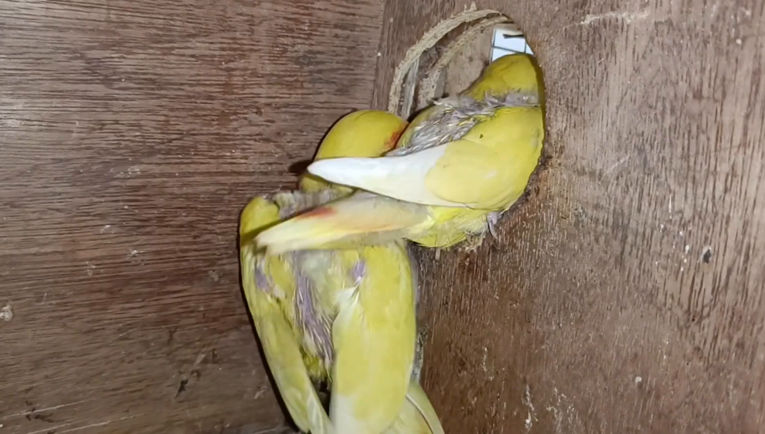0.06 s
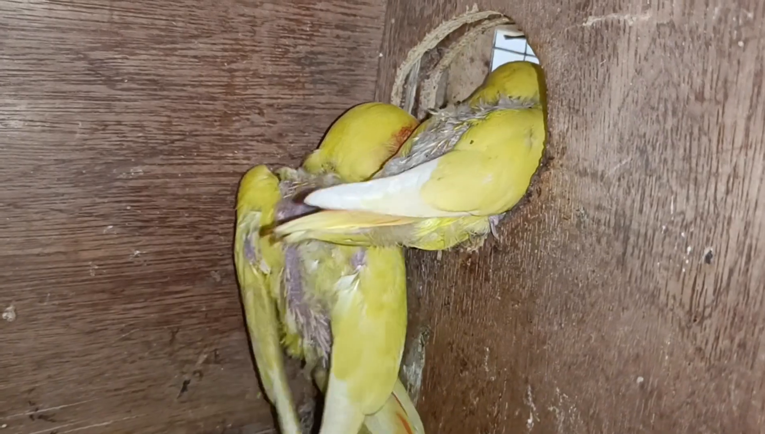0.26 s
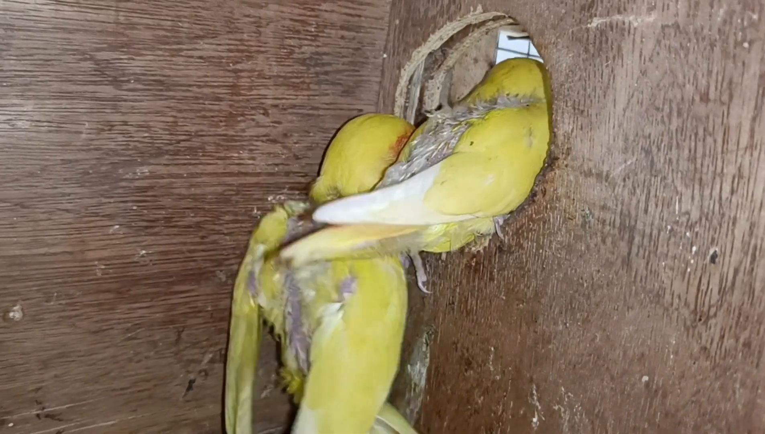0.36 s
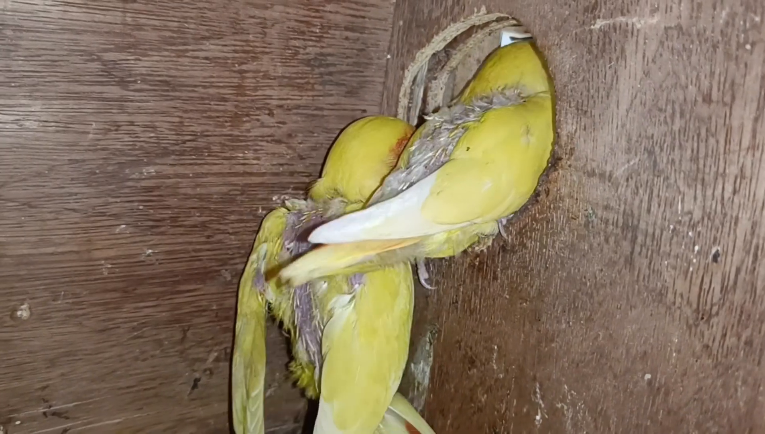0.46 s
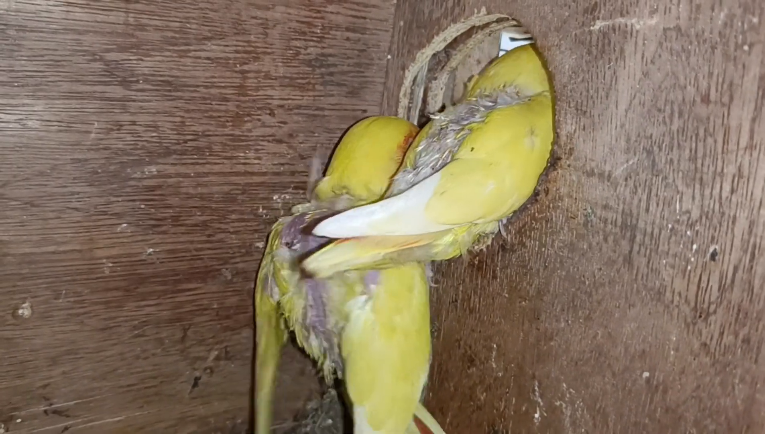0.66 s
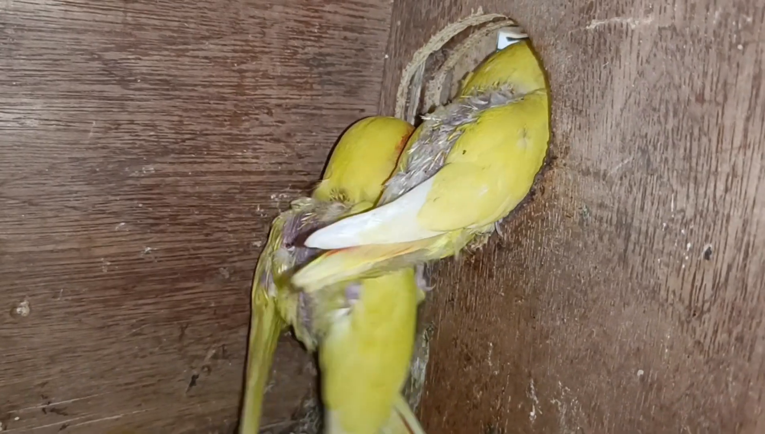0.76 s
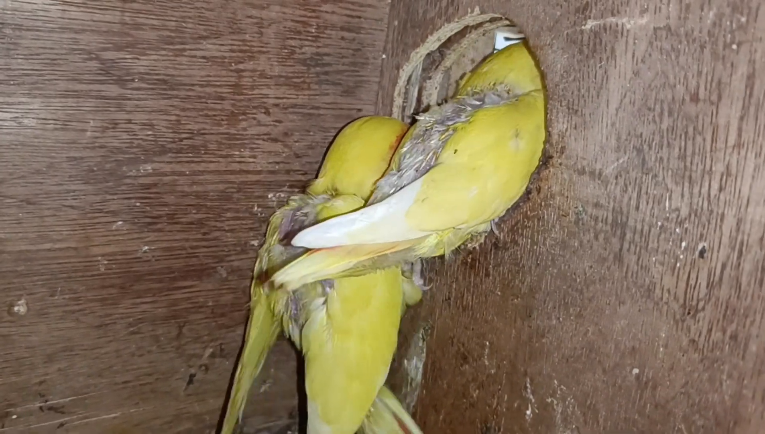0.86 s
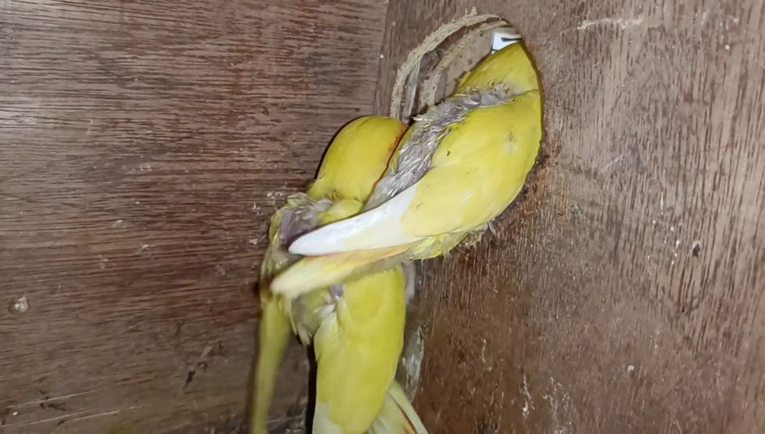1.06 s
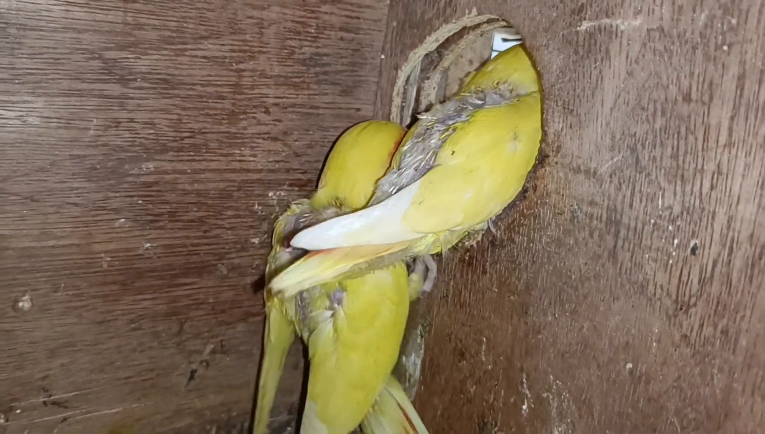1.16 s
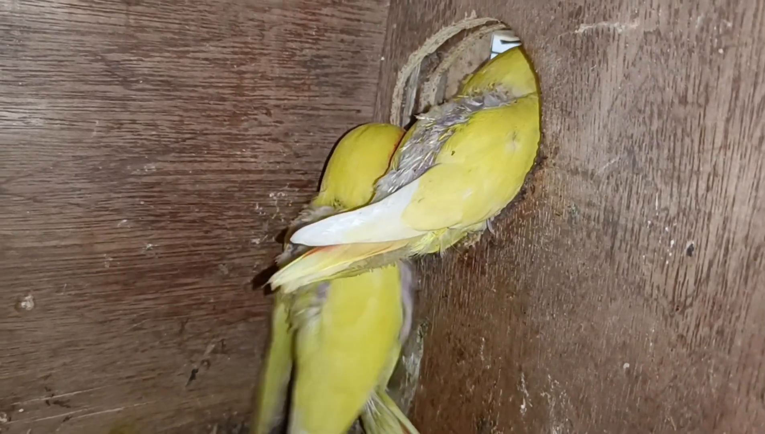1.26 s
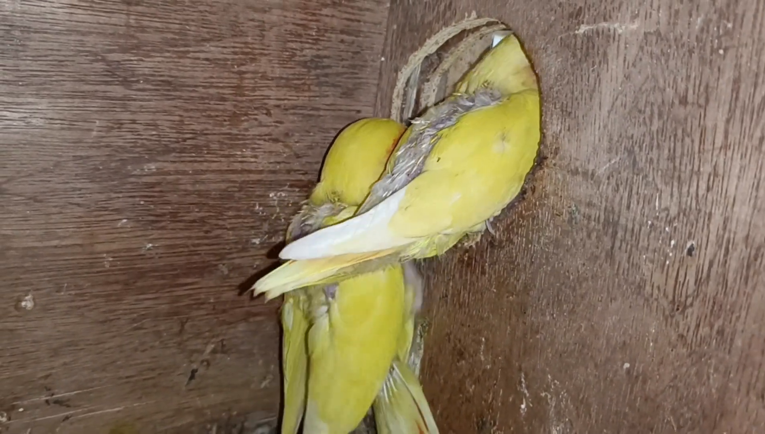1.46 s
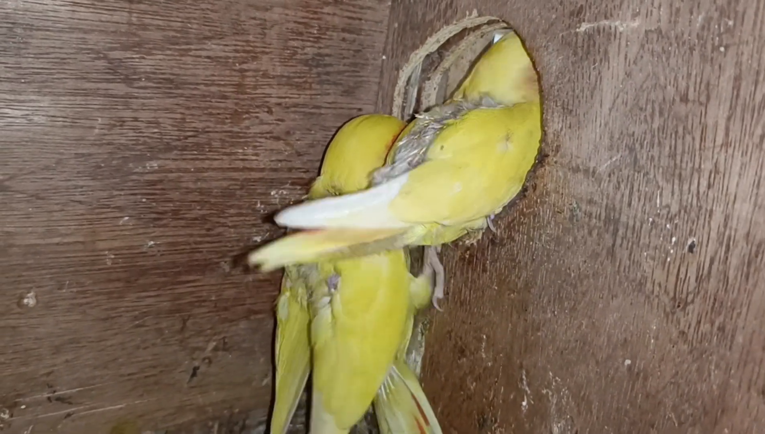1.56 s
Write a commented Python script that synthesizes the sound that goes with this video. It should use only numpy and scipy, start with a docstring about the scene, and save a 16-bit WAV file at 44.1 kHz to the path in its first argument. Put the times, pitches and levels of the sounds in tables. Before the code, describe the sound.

Small parrots call close to the microphone in a bare, ringing room: faint echo first, a short two-voiced chirp, a brief gap, then sharp flicks and a longer raspy screech with a trill, over low hum.

```python
"""Small parrots screech close by at a wooden nest box in a bare, echoing room, over a low wavering hum.
Each note is a stack of whistled overtones, roughened or trilled; noise makes a rasp of air beside them.
Smeared bands of noise make three stretches of echo: the first swells a little, the others die away.
A tick, low blips and a dull rustle lie among the calls; the room's ring is cut short once.
Box reflections and a long tail surround the birds, and the two microphone sides differ in colour and phase."""
import sys
import numpy as np
from scipy import signal
from scipy.fft import rfft, irfft
from scipy.io import wavfile

SR = 44100
rng = np.random.default_rng(int(sys.argv[2]) if len(sys.argv) > 2 else 0)


def transcribe(u):
    """Save the signal u as a 16-bit wav file named by the first command-line argument.

    u: samples, shape (n,) or (channels, n), limited to [-1, 1]; the rate is SR.
    q: integer samples, one column per channel.
    """
    v = np.clip(np.atleast_2d(u).T, -1, 1)
    q = np.round(v * 32767).astype(np.int16)
    wavfile.write(sys.argv[1], SR, q)


N = 70560    # 1.6 s

# Levels are those of the sources, ahead of the room and the microphones.
# Noise bed of the room: (frequency [Hz], relative density [dB])
HUM_SPECTRUM = [(15, -40), (30, -13.5), (85, -6.5), (118, 1.5), (160, -7), (200, -9.5), (252, -2),
                (300, -9.5), (320, -20.5), (480, -17), (800, -17.5), (1500, -28), (2500, -19), (5500, -44)]
# Wavering of the hum: (time [s], level [dB])
HUM_LEVEL = [(0, -42), (0.372, -40), (.46, -37), (0.598, -35.5), (.69, -34.5), (.84, -36.5), (1.029, -45.5),
             (1.082, -31.5), (1.131, -40), (1.382, -39), (1.6, -43)]
# How alike the hum is at the two sides: (frequency [Hz], left-right correlation [-1 to 1])
HUM_LIKENESS = [(60, .96), (160, .93), (270, .7), (600, .45), (1200, -.2), (2500, .05)]
HISS_DB = -55.5

# Echoes of earlier calls: (start [s], end [s], pitch [Hz], level [dB], fall [dB/s], overtone levels [dB],
# line width of the fundamental [Hz], rasp level [dB])
ECHOES = [(0, 0.186, 3020, -47.5, -9, [0, 0.41, -11.5], 140, -14.5),
          (0.191, 0.455, 1666, -46.5, 59.5, [1, 15, 14.5, 20, -15, -26], 74, 19),
          (0.654, 0.872, 2824, -25, 49, [0, -0.96, -10], 204, 1.5)]
ECHO_EDGE_S = 0.019

# Short dull rustle: (start [s], end [s], low edge [Hz], high edge [Hz])
RUSTLE = (.18, .238, 700, 1700)
RUSTLE_DB = -37
# The two tones of the beak tick: (frequency [Hz])
TICK_TONES = [3440, 7320]
TICK_S, TICK_DB = .6405, -6
# Low blips: (time [s], frequency [Hz], level [dB])
BLIPS = [(.704, 1600, -33), (.922, 1600, -28), (1.05, 1550, -34)]
BLIP_S = .002    # from the peak down to 1/e

# Pitch contours of the notes: (time [s], pitch [Hz], level [dB])
CHIRP = [(.44, 2886, -27.5), (.45, 2893, -23.5), (.478, 3083, -30.5)]
UPPER = [(.478, 3380, -23), (.52, 3320, -23.5), (.562, 3270, -24), (.578, 3050, -31)]
LOWER = [(.455, 1550, -41.5), (.476, 1572, -32), (.487, 2020, -27.5), (.548, 1963, -29.5), (.56, 1900, -33)]
FALL = [(.566, 1928, -33), (.578, 1930, -34.5), (.594, 1594, -27.5), (.612, 1400, -35.5)]
WHISTLE = [(.995, 4353, -19), (1.03, 4424, -17), (1.038, 4460, -17)]
FLICK_A = [(.668, 3870, -24), (.675, 3757, -16.5), (.687, 3653, -5), (.693, 4780, -23.5), (.697, 3827, -8),
           (.701, 3060, -24)]
FLICK_B = [(.885, 4010, -14.5), (.892, 3947, -7), (.907, 3853, -10.5), (.911, 5483, -10.5),
           (.914, 5420, -21), (.917, 4056, -12.5), (.93, 2694, -27.5)]
DROP = [(.836, 3880, -26), (.843, 3926, -23), (.851, 3507, -19), (.857, 2964, -25), (.867, 2900, -25)]
SQUEAL = [(.698, 3345, -26), (.705, 3424, -25), (.73, 3354, -34), (.765, 3327, -30.5), (.8, 3426, -32),
          (.835, 3460, -44)]
RISE_A = [(0.8, 1397, -39), (0.836, 1448, -33.5), (.852, 1747, -28), (0.862, 2034, -24.5),
          (0.878, 2064, -30.5)]
SCREECH = [(.922, 3845, -27.5), (.936, 3925, -9.5), (.965, 4040, -15.5), (.985, 4200, -18),
           (1.02, 4240, -20), (1.05, 4209, -23), (1.09, 4098, -24.5)]
TRILL = [(.9935, 3420, -20), (1.003, 3640, -18), (1.022, 3550, -19), (1.04, 3250, -26), (1.085, 3150, -31)]
RISE_B = [(1.043, 1400, -33), (1.07, 1440, -30), (1.086, 1530, -30), (1.091, 1750, -24), (1.098, 1973, -22),
          (1.12, 1938, -25), (1.128, 1890, -30)]
# How each note is sung: (contour, overtone levels [dB], pitch jitter [share], flutter [dB],
# trill rate [Hz, 0 for none], room send [dB])
NOTES = [(CHIRP, [0, -10, -22], .002, 1.0, 0, -9), (UPPER, [0, -1, -20], .004, 2, 0, -9),
         (LOWER, [0, -7, -22], .005, 2, 0, -7), (FALL, [0, 4, -4], .006, 2.5, 0, -6), (FLICK_A, [0, -26],
         .004, 1.5, 0, -5), (FLICK_B, [0, -10], .004, 1.5, 0, -5), (SQUEAL, [0, 9, -14],
         .013, 4.0, 0, -1.5), (RISE_A, [0, 8, 5, 1.5, -5], .004, 2.2, 0, -8), (SCREECH, [0, -2.5, -30],
         .012, 4.5, 0, 1.5), (WHISTLE, [0], .004, 2.5, 0, -1.5), (TRILL, [0, -3], .008, 1.5, 132, -5),
         (RISE_B, [0, 6, 10, 2, -9, -15, -7], .003, 1.5, 0, -11), (DROP, [0, -15], .006, 1.5, 0, -4)]
# Colour of the open beak: (frequency [Hz], gain [dB])
THROAT = [(1400, -4), (1900, -1.5), (7000, -1.5), (7800, -5.5), (8400, -1)]
# Side tones of two voices mixing in one throat: (low edge [Hz], high edge [Hz], gain [dB])
MIX_BANDS = [(2450, 2950, 30), (4500, 5700, 26)]
NOTE_EDGE_S = .003
DULLING = .05    # dB per overtone step, per dB that the note is under its loudest

# Colour of the air rasp, also used for hiss: (frequency [Hz], relative density [dB])
RASP_SPECTRUM = [(900, -24.5), (1500, -17.5), (2450, -10), (3000, -7), (3700, -2), (5000, -9), (6500, -5.5),
                 (8500, -14), (10000, -18), (13300, -26.5), (15500, -37)]
# Air rasping in the throats: (time [s], level [dB])
RASP_LEVEL = [(0.439, -51), (.48, -28), (.6, -34), (.62, -48), (0.652, -30.5), (0.699, -38), (.83, -23),
              (0.859, -18.5), (.93, -39), (1.002, -25.5), (1.1, -20.5), (1.13, -34)]
RASP_FLUTTER_DB = 1.8

# Ring of the bare room: (frequency [Hz], time to fall 60 dB [s])
ROOM_T60 = [(1000, 1.1), (2600, 0.93), (5000, 1.046), (8000, 0.7), (14000, 0.71)]
BOX_DB, BOX_T60_S, ROOM_DB = -9, .02, -3.5
RING_CUT_AT_S, RING_CUT_FADE_S = 0.622, 0.06

# Colour difference of the microphone sides: (frequency [Hz], left minus right [dB])
SIDE_BALANCE = [(60, 0), (160, 1), (270, 8), (450, -2.5), (1560, 5), (2700, -1), (4500, -5), (6300, -17),
                (7400, 2.5), (8500, 17), (11300, 1), (15000, -27)]
# Phase difference of the microphone sides: (frequency [Hz], left minus right [rad])
SIDE_PHASE = [(500, 0), (1200, 1.2), (2500, 1.17), (5000, 1.89)]
CUTOFF_HZ = 15760


def amp(db):
    """Turns decibels into an amplitude factor."""
    return 10 ** (np.asarray(db) / 20)


def rms_one(x):
    """Scales a signal to an overall RMS of 1."""
    return x / np.sqrt(np.mean(x ** 2) + 1e-20)


def at_hz(points, hz):
    """Reads a frequency table along a logarithmic frequency axis."""
    table_hz, values = np.array(points).T
    return np.interp(np.log(np.maximum(hz, 1)), np.log(table_hz), values)


def gate(start, end, edge):
    """Fully open from start to end, with linear ramps just outside them."""
    t = np.arange(N) / SR
    return np.clip((t - start) / edge + 1, 0, 1) * np.clip((end - t) / edge + 1, 0, 1)


def drift(rate):
    """Random wavering of RMS 1: noise smoothed by two equal poles at rate Hz."""
    r = np.exp(-2 * np.pi * rate / SR)
    noise = rng.standard_normal(N + 4000)
    return rms_one(signal.lfilter([1], [1, -2 * r, r * r], noise)[4000:])    # drop the run-in


def shaped(x, gain):
    """Multiplies the spectrum by gain(Hz)."""
    return irfft(rfft(x) * gain(np.fft.rfftfreq(N, 1 / SR)), N)


def coloured(spectrum, channels):
    """Noise of RMS 1 that follows a spectrum table."""
    noise = rng.standard_normal((channels, N))
    return rms_one(shaped(noise, lambda hz: amp(at_hz(spectrum, hz))))


def bandpass(x, low_hz, high_hz):
    """Keeps the band between two frequencies with a Butterworth filter."""
    return signal.sosfilt(signal.butter(2, [low_hz, high_hz], "band", fs=SR, output="sos"), x)


def hum():
    """Low wavering room noise, alike at both sides in the bass, with faint steady hiss."""
    mid, side = coloured(HUM_SPECTRUM, channels=2)

    def alike(hz):
        return np.clip(at_hz(HUM_LIKENESS, hz), -1, 1)

    # the shared and opposed parts set the left-right correlation
    mid = shaped(mid, lambda hz: np.sqrt(1 + alike(hz)))
    side = shaped(side, lambda hz: np.sqrt(1 - alike(hz)))
    s, db = np.transpose(HUM_LEVEL)
    level = amp(np.interp(np.arange(N) / SR, s, db)) / np.sqrt(2)
    hiss = amp(HISS_DB) * coloured(RASP_SPECTRUM, channels=2)
    return level * (mid + side * np.array([[1], [-1]])) + hiss


def echoes():
    """Echoes of earlier calls: overtones smeared into noise bands, plus rasp, unlike at the two sides."""
    out, t = 0, np.arange(N) / SR
    for start, end, pitch_hz, db, fall_db, overtones_db, width_hz, rasp_db in ECHOES:
        lines = 0
        for k, overtone_db in enumerate(overtones_db, 1):
            noise = rng.standard_normal((2, N))
            half_width = k * width_hz / 2
            line = shaped(noise, lambda hz: 1 / (1 + ((hz - k * pitch_hz) / half_width) ** 4))
            lines = lines + amp(overtone_db) * rms_one(line)
        rasp = amp(rasp_db) * coloured(RASP_SPECTRUM, channels=2)
        level = amp(db - fall_db * (t - start)) * gate(start, end, ECHO_EDGE_S)
        out = out + (lines + rasp) * level
    return out


def rustle():
    """Short dull rustle: band-limited noise with a wavering level."""
    start, end, low_hz, high_hz = RUSTLE
    band = bandpass(rng.standard_normal((2, N)), low_hz, high_hz)
    return amp(RUSTLE_DB + 2.4 * drift(49)) * rms_one(band) * gate(start, end, .01)


def beak_tick():
    """Beak tick: two tones that swell and die within a few milliseconds."""
    t = np.maximum(np.arange(N) / SR - TICK_S, 0)
    tones = sum(np.sin(2 * np.pi * hz * t) for hz in TICK_TONES)
    return amp(TICK_DB) * (t / 0.00045) * np.exp(-t / 0.00051) * tones


def low_blips():
    """Low blips: sine tones under short bell-shaped envelopes."""
    t = np.arange(N) / SR
    return sum(amp(db) * np.exp(-((t - s) / BLIP_S) ** 2) * np.sin(2 * np.pi * hz * t)
               for s, hz, db in BLIPS)


def note(contour, overtones_db, jitter, flutter_db, trill_hz):
    """Overtones on a jittery pitch, duller when soft, fluttering and perhaps pulsed by a trill."""
    t = np.arange(N) / SR
    s, hz, db = np.transpose(contour)
    pitch, level_db = np.interp(t, s, hz), np.interp(t, s, db)
    phase = 2 * np.pi * np.cumsum(pitch * (1 + jitter * drift(156.6))) / SR
    under_peak_db = level_db - db.max()
    tone = 0
    for k, overtone_db in enumerate(overtones_db, 1):
        colour_db = overtone_db + at_hz(THROAT, k * pitch) + (k - 2.5) * DULLING * under_peak_db
        audible = k * pitch < CUTOFF_HZ
        tone = tone + amp(colour_db) * np.sin(k * phase + k * k) * audible
    pulse = 2 * np.cos(np.pi * trill_hz * (t - s[0])) ** 4 if trill_hz else 1
    level = amp(level_db + flutter_db * drift(166)) * gate(s[0], s[-1], NOTE_EDGE_S)
    return np.sqrt(2) * tone * pulse * level


def throat_mix(upper, lower):
    """Side tones of two voices in one throat: their product, picked out in bands."""
    return sum(amp(db) * bandpass(upper * lower, low_hz, high_hz) for low_hz, high_hz, db in MIX_BANDS)


def air_rasp():
    """Air rasping in the throats: coloured noise with a fluttering level."""
    s, db = np.transpose(RASP_LEVEL)
    level_db = np.interp(np.arange(N) / SR, s, db) + RASP_FLUTTER_DB * drift(120)
    return amp(level_db) * coloured(RASP_SPECTRUM, channels=2) * gate(s[0], s[-1], NOTE_EDGE_S)


def birds():
    """All calls, direct and as sent to the room; UPPER and LOWER are two voices sung at once."""
    sung = [note(*row[:-1]) for row in NOTES]
    mixed = throat_mix(sung[1], sung[2])
    rasp = air_rasp()
    direct = mixed + rasp + sum(sung)
    send = rasp + sum(voice * amp(row[-1]) for voice, row in zip(sung, NOTES))
    return direct, send


def echo(x, db, response):
    """Convolves a sound with a noise response scaled to unit energy."""
    return amp(db) * signal.fftconvolve(x, rms_one(response) / np.sqrt(N), axes=1)[:, :N]


def room(direct, send):
    """Direct sound, quick reflections off the box and a long diffuse tail that dies band by band."""
    t = np.arange(N) / SR
    edges = 700 * 2 ** np.arange(0, 4.6, .5)    # half-octave bands [Hz]
    white = rng.standard_normal((3, 2, N))
    tail = 0
    for k, (low_hz, high_hz) in enumerate(zip(edges, edges[1:])):
        decay = amp(-60 * t / at_hz(ROOM_T60, np.sqrt(low_hz * high_hz)))
        tail = tail + bandpass(white[k % 2], low_hz, high_hz) * decay
    tail = tail * np.clip(t / 0.019, 0, 1)    # the tail builds up over 19 ms
    box = white[2] * amp(-60 * t / BOX_T60_S)
    return direct + echo(direct, BOX_DB, box) + echo(send, ROOM_DB, tail)


def scene():
    """Birds and small noises in the room, whose first ring is faded out early, over echoes and hum."""
    direct, send = birds()
    direct = direct + beak_tick() + low_blips() + rustle()
    before = np.arange(N) < RING_CUT_AT_S * SR
    first = room(direct * before, send * before) * gate(0, RING_CUT_AT_S, RING_CUT_FADE_S)
    second = room(direct * ~before, send * ~before)
    return first + second + echoes() + hum()


def record(dry):
    """The two microphone sides differ in colour and phase; peaks are rounded, the top is cut."""
    sides = []
    for x, sign in zip(dry, (1, -1)):    # each side takes half of the difference

        def response(hz):
            colour = amp(sign * at_hz(SIDE_BALANCE, hz) / 2)
            return colour * np.exp(.5j * sign * at_hz(SIDE_PHASE, hz))

        sides.append(shaped(x, response))
    soft = .92 * np.tanh(np.array(sides) / .92)
    return signal.sosfilt(signal.cheby2(20, 60, CUTOFF_HZ, fs=SR, output="sos"), soft)


dry = scene()
out = record(dry)
transcribe(out)
```